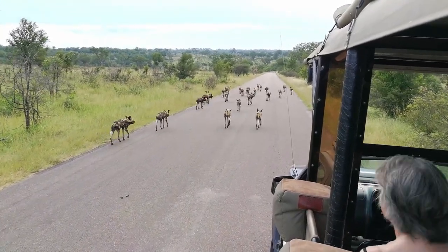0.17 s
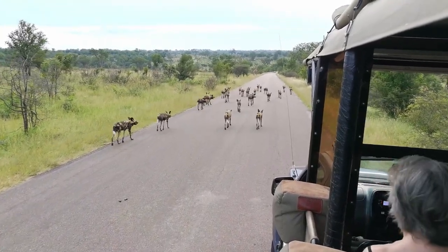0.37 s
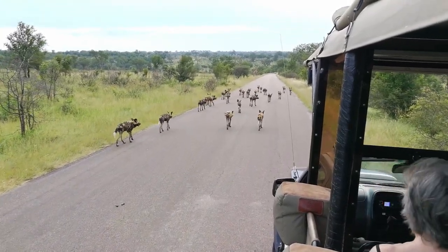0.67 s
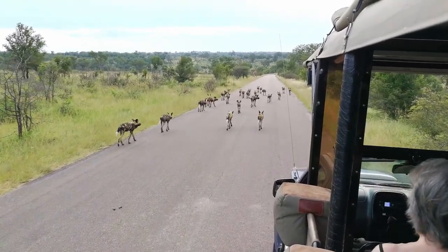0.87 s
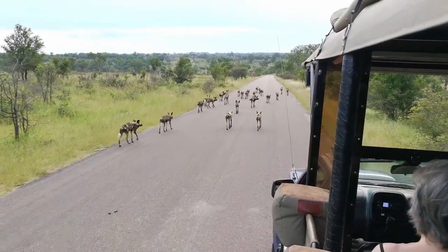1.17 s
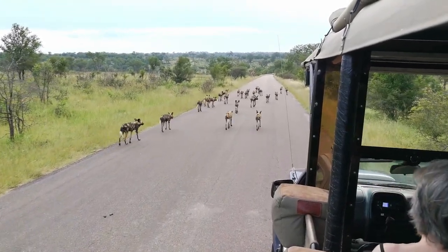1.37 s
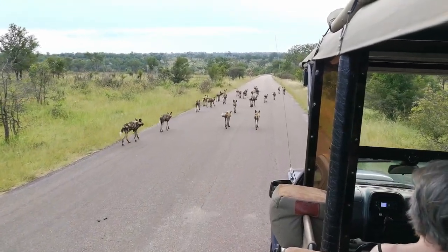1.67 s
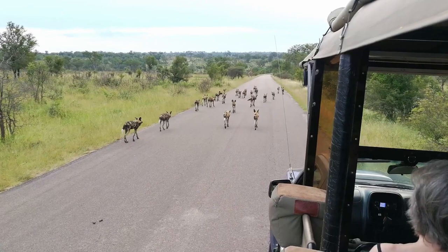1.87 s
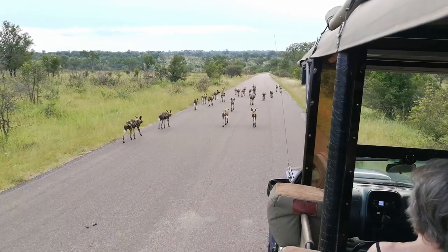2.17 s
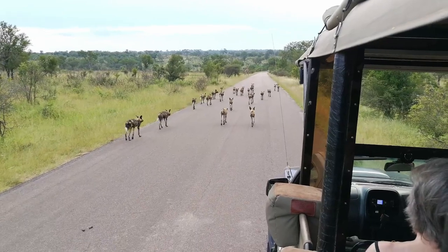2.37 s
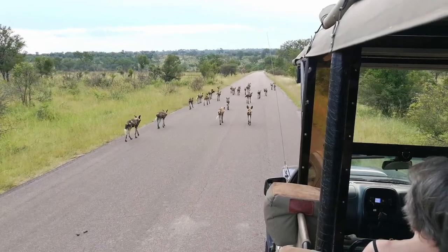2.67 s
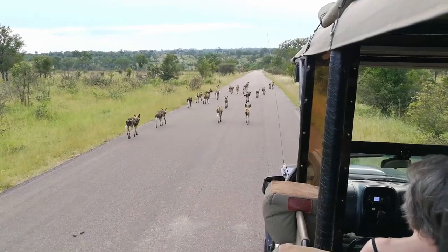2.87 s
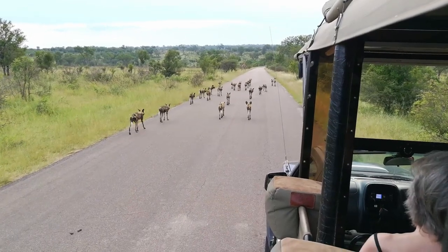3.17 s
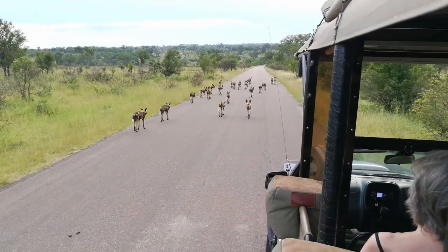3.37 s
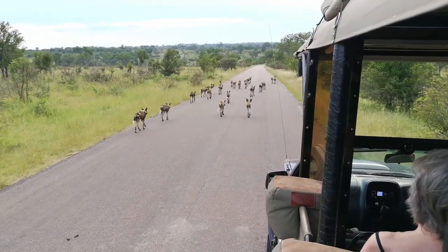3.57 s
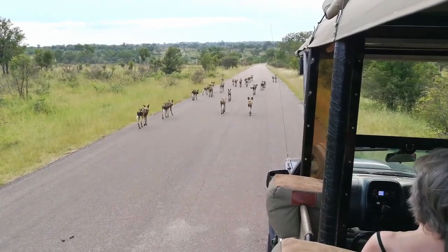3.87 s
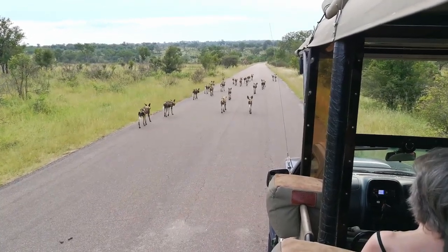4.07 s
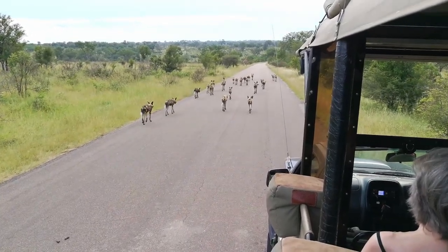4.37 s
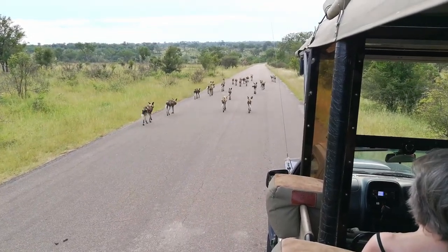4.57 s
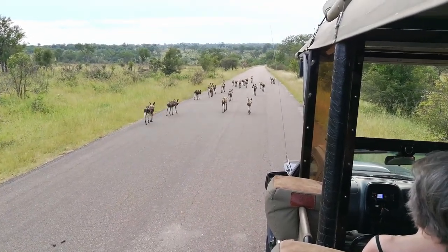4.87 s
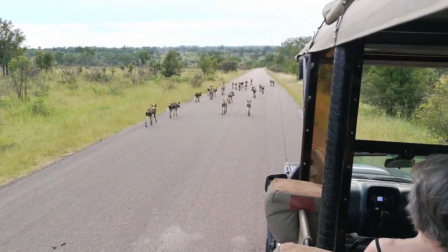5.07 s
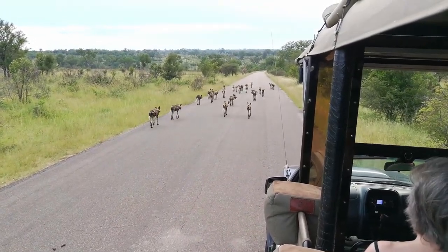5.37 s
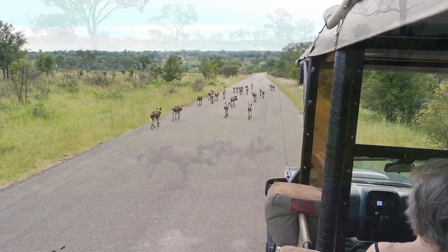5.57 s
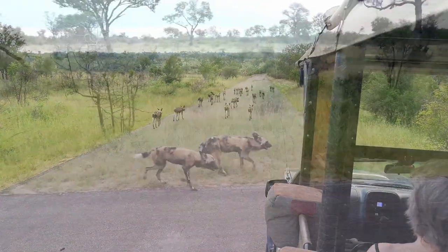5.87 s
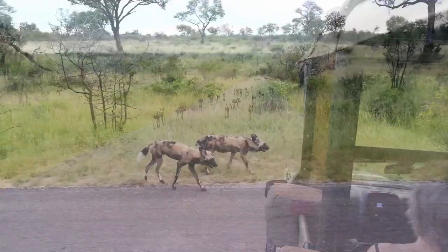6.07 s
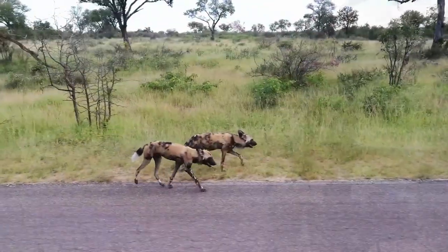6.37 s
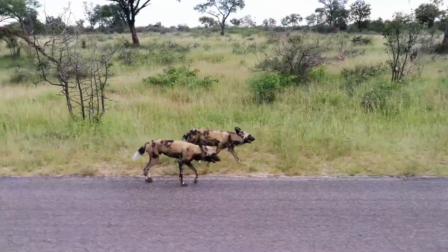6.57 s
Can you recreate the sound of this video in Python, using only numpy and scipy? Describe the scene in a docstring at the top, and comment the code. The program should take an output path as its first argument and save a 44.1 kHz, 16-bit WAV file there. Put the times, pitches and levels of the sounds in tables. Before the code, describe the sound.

Outdoors beside a vehicle on a bush road, a pack of wild dogs calls without pause. Tiny high chips and raspy squeals overlap throughout; wheezy whines and fluttering peeps fill the first half. From the middle onward, short bright yips jump out, louder and slightly to the left. Two brief whistles flick upward. Insects hiss thinly over faint air and low breeze, heard from a microphone near the pack.

```python
"""A pack of wild dogs calls on a bush road beside a parked open vehicle; insects hiss over faint outdoor air.
From the start: wheezy whines (tone, hum, throbbing wheeze) and thin fluttering peeps, until about 3.8 s.
Throughout: chips (fast pitch arches with an air puff) and raspy squeals (shaken harmonics with air noise).
Whistles flick up at 0.7 and 4.4 s; arched harmonic yips run from 2.5 to 5.9 s; two whimpers fall after 5.5 s.
Every call is scattered by the road, vehicle and scrub."""
import sys
import numpy as np
from scipy import signal
from scipy.fft import rfft, irfft
from scipy.io import wavfile

SR = 44100
rng = np.random.default_rng(int(sys.argv[2]) if len(sys.argv) > 2 else 0)


def to_wav(sig):
    """Store sig (one row per channel, or 1-D mono) as 16-bit WAV at the path in sys.argv[1].

    Samples outside -1..1 are clipped; the rate is SR.
    """
    pcm = np.clip(np.atleast_2d(sig), -1, 1) * 32767
    pcm = np.round(pcm).astype(np.int16)
    wavfile.write(sys.argv[1], SR, pcm.T)  # frames by channels


N = 296793
TIME_S = np.arange(N) / SR


def undb(db):
    """Decibels to gain."""
    return 10 ** (np.asarray(db) / 20)


def unit(x):
    """Scale to rms 1."""
    return x / np.sqrt(np.mean(x ** 2) + 1e-18)


def gain_at(hz, points):
    """Gain of a (freq_hz, gain_db) colour, interpolated over log frequency."""
    f, db = np.transpose(points)
    return undb(np.interp(np.log(np.maximum(hz, 1)), np.log(f), db))


def noise(points):
    """Gaussian noise shaped to a colour in the spectrum, rms 1."""
    freq_hz = np.arange(N // 2 + 1) * SR / N
    spectrum = rfft(rng.standard_normal(N)) * gain_at(freq_hz, points)
    return unit(irfft(spectrum, N))


def wobble(size, hz):
    """Random curve of spread about 1, with hz new values a second joined by straight lines."""
    steps = np.arange(size) * hz / SR
    return 1.2 * np.interp(steps, np.arange(4096), rng.standard_normal(4096))


def progress(length_s):
    """Runs from 0 to 1 through a call."""
    return np.linspace(0, 1, int(length_s * SR))


def swell(u, rise, fall):
    """Smooth onset and release, each a share of the call."""
    onset = np.sin(np.pi / 2 * np.clip(u / rise, 0, 1))
    release = np.sin(np.pi / 2 * np.clip((1 - u) / fall, 0, 1))
    return onset * release


def cycles(hz):
    """Phase in radians of a moving frequency."""
    return 2 * np.pi * np.cumsum(hz) / SR


def voice(hz, throat, mouth, count):
    """Harmonics of a moving pitch, weighted by the throat, whose resonances rise as the mouth opens."""
    k = np.arange(1, count + 1)[:, None]
    phase = cycles(hz) + 2 * np.pi * rng.random()
    return np.sum(gain_at(k * hz / mouth, throat) * np.sin(k * phase), axis=0)


def turbulence(centre_hz, width_hz):
    """Rushing air in a moving resonance: two random curves on a carrier in quadrature, rms 1."""
    phase = cycles(centre_hz)
    in_phase = wobble(len(centre_hz), width_hz) * np.sin(phase)
    quadrature = wobble(len(centre_hz), width_hz) * np.cos(phase)
    return unit(in_phase + quadrature)


def add(track, start_s, sound):
    """Mix a call into a track."""
    i = max(int(start_s * SR), 0)
    track[i:i + len(sound)] += sound[:N - i]


def outdoors(x, pan_db, near_db, far_db, near_t60_s=0.11, far_t60_s=0.39, shared=0.78):
    """Direct sound, quick reflections from road and vehicle, and a thin tail from the scrub, for two ears."""
    t = np.arange(SR // 2) / SR
    common, left, right = rng.standard_normal((3, len(t)))
    shared = np.clip(shared, 0, 1)
    ears = []
    for own, side in ((left, 1), (right, -1)):
        scatter = np.sqrt(shared) * common + np.sqrt(1 - shared) * own
        scatter = scatter * (1 - np.exp(-t / 0.0034))
        response = np.zeros(len(t))
        for db, t60_s in ((near_db, near_t60_s), (far_db, far_t60_s)):
            response += undb(db) * unit(scatter * np.exp(-np.log(1000) * t / t60_s))
        response /= np.sqrt(len(t))
        # direct sound from well to one side reaches the far ear a sample later
        lag = int(side * pan_db < -2)
        response[lag] += undb(side * pan_db / 2)
        ears.append(signal.fftconvolve(x, response)[:N])
    return np.array(ears)


# colour of the outdoor hush: [freq_hz, gain_db]
AIR_COLOUR = [(25, -9), (60, -18), (125, -3), (250, 2), (370, 3), (550, 2.5), (1000, -0.5), (2000, -2),
              (3600, -0.5), (5000, 4.5), (6800, 5.5), (7700, -1), (11000, -6.5), (15500, -10.5)]
# low rumble between the puffs: [time_s, level_db]
RUMBLE_LEVEL = [(0, -87), (2.1, -93), (2.6, -80), (4.1, -88), (4.6, -80), (5.6, -81), (6.73, -94)]
# low puffs of breeze: [middle_s, level_db]
BREEZE_PUFFS = [(0.84, -72), (2.27, -79), (3.13, -69), (3.88, -78), (4.76, -77), (5.8, -68)]
PUFF_WIDTH_S = 0.038


def air(air_db=-56.5, distance_db=-64.0, gust_db=3.0):
    """Diffuse hush, separate on each side; distant noise, uneven rumble and breeze puffs common to both."""
    hush = np.array([noise(AIR_COLOUR) for _ in range(2)])
    distance = noise([(100, -11.5), (350, -3.5), (1200, -1.5), (4000, 1.5), (8000, -65)])
    breeze = undb(np.interp(TIME_S, *np.transpose(RUMBLE_LEVEL)) + gust_db * wobble(N, 16))
    puffs = sum(undb(db) * np.exp(-((TIME_S - middle_s) / PUFF_WIDTH_S) ** 2) for middle_s, db in BREEZE_PUFFS)
    rumble = noise([(20, -9), (65, 5), (110, -1.5), (250, -23.0), (1000, -67)]) * (breeze + puffs)
    return undb(air_db) * hush + undb(distance_db) * distance + rumble


# colour of the insect hiss: [freq_hz, gain_db]
INSECT_COLOUR = [(7750, -49), (8100, -4), (8650, 3), (9100, -2), (9450, 1.5), (9800, -6.5), (10200, -11.5),
                 (11200, -31)]
INSECT_START_DB, INSECT_FADE_DB_PER_S = -53.7, 0.28


def insects(swell_db=0.46, swell_hz=4, shimmer_db=0.92, shimmer_hz=60):
    """Many insects merge into a slowly thinning band of noise; each side shimmers on its own."""
    db = INSECT_START_DB - INSECT_FADE_DB_PER_S * TIME_S + swell_db * wobble(N, swell_hz)
    return np.array([noise(INSECT_COLOUR) * undb(db + shimmer_db * wobble(N, shimmer_hz)) for _ in range(2)])


# soft falling whimpers: [start_s, length_s, mid_pitch_hz, level_db]
WHIMPER_CALLS = [(5.585, 0.055, 3080, -55), (6.617, .09, 2300, -59)]


def whimpers(fall=0.12):
    """Short, soft, breathy notes of narrow noise that slide down."""
    out = np.zeros(N)
    for start_s, length_s, hz, db in WHIMPER_CALLS:
        u = progress(length_s)
        note = turbulence(hz * (1 + fall * (.5 - u)), 205)
        add(out, start_s, undb(db) * note * swell(u, .15, 0.97))
    return outdoors(out, pan_db=2, near_db=-4, far_db=-19)


# long wheezy whines: [start_s, length_s, mid_pitch_hz, level_db]
WHINE_CALLS = [(0, 0.36, 2180, -65), (.28, 0.42, 2125, -58), (1.118, 0.38, 2170, -60.5),
               (1.498, 0.33, 2290, -57), (1.741, 0.25, 2120, -58.5), (3.108, .3, 2215, -55),
               (3.362, 0.28, 2073, -59.5)]
WHEEZE_HZ = 4767  # centre of the high wheeze over every whine


def whines(fall=0.063, throb_hz=70, hum_hz=365, hum_db=-15.5, third_db=-19, tone_db=-8,
           overtone_db=-11, core_db=-6, fade_db=4, waver=0.0139, flutter_db=2.0):
    """A hoarse tone sinks between a faint low hum and a throbbing high wheeze with a whistling core."""
    out = np.zeros(N)
    for start_s, length_s, hz, db in WHINE_CALLS:
        u = progress(length_s)
        size = len(u)
        sink = 1 + fall * (.5 - u) + waver * wobble(size, 89.5)
        tone = undb(tone_db) * turbulence(hz * sink, 280)
        tone = tone + undb(overtone_db) * turbulence(4100 * sink, 300)
        phase = cycles(hum_hz * (1 + 0.018 * wobble(size, 144.7)))
        hum = undb(hum_db) * np.sin(phase) + undb(third_db) * np.sin(3 * phase)
        wheeze = np.sin(cycles(WHEEZE_HZ * (1 + 0.0807 * wobble(size, 2600))))
        wheeze = wheeze + undb(core_db) * turbulence(WHEEZE_HZ * np.sqrt(sink), 260)
        beat = 1 + .65 * np.sin(cycles(throb_hz * (1 + .12 * wobble(size, 40))))
        wheeze_gain = beat * undb(flutter_db * wobble(size, 37.3) - fade_db * u)
        whine = unit(tone + hum + wheeze * wheeze_gain)
        add(out, start_s, undb(db) * whine * swell(u, 0.019, 0.23))
    return outdoors(out, pan_db=-1.5, near_db=-7.5, far_db=-1.5)


# whistles: [start_s, length_s, base_pitch_hz, start_level_db, sag_share_of_pitch]
WHISTLE_CALLS = [(0.66, 0.078, 4890, -50.5, 0.077), (4.362, .11, 5010, -44, 0.045)]


def whistles(scoop=0.062, flick=0.184, fade_db=6.3):
    """Pure sine notes that scoop in, sag, then flick upward, fading all the way."""
    out = np.zeros(N)
    for start_s, length_s, hz, db, sag in WHISTLE_CALLS:
        u = progress(length_s)
        bend = sag * (.5 - u) + flick * u ** 7 - scoop * np.exp(-u / 0.084)
        pitch_hz = hz * (1 + bend + 0.0067 * wobble(len(u), 460))
        note = unit(np.sin(cycles(pitch_hz)))
        add(out, start_s, undb(db - fade_db * u) * note * swell(u, 0.18, 0.065))
    return outdoors(out, pan_db=-1, near_db=-16, far_db=-21)


# thin rough peeps: [start_s, level_db]
PEEP_CALLS = [(0, -46), (0.088, -55), (0.163, -46), (0.321, -49.5), (0.385, -47), (0.49, -50), (0.6, -49),
              (0.72, -45.5), (1.51, -47), (2.339, -52.5), (2.457, -52), (2.592, -50.5), (2.724, -49.5),
              (2.861, -48), (3.023, -47), (3.184, -50.5), (3.679, -49)]


def peeps(length_s=0.0408, hz=4950, climb=0.1564, rough=0.066, trill_hz=170, trill=0.038):
    """Thin sine notes, roughened by random pitch shake, that trill as they rise."""
    out, u = np.zeros(N), progress(length_s)
    for start_s, db in PEEP_CALLS:
        shake = trill * np.sin(2 * np.pi * (trill_hz * length_s * u + rng.random()))
        shake = shake + rough * wobble(len(u), 2217)
        pitch_hz = hz * (1 + climb * (np.sqrt(u) - .65) + shake)
        add(out, start_s, undb(db) * unit(np.sin(cycles(pitch_hz))) * swell(u, 0.083, 1.0))
    return outdoors(out, pan_db=0, near_db=-4.0, far_db=-35)


# chips, before the voice and puff offsets: [middle_s, level_db]
CHIP_CALLS = [(0.17, -49), (0.389, -51), (0.578, -49.5), (0.711, -48), (0.935, -48), (1.141, -50),
              (1.391, -49.5), (1.563, -50.5), (1.707, -47), (1.888, -50), (2.027, -51), (2.244, -49.5),
              (2.289, -57.5), (2.703, -49), (2.807, -47), (3.015, -48), (3.235, -47.5), (3.641, -57),
              (4.09, -49), (4.287, -51.5), (4.574, -48.5), (4.779, -50.5), (4.981, -46.5), (5.202, -47.5),
              (5.267, -59), (5.322, -57), (5.424, -46.5), (5.646, -50), (5.801, -47.5), (5.969, -46),
              (6.162, -47.5), (6.307, -47.5), (6.428, -45), (6.624, -46.5)]
# chip throat colour: [freq_hz, gain_db]
CHIP_COLOUR = [(1200, -7), (2200, -9), (3000, -4), (3400, 1.5), (4200, -4), (6000, -13.5), (9000, -35)]
FAINT_CHIP_DB, FAINT_CHIP_SPREAD_DB = -55, 6.5  # centre and half range, before the same offsets


def chips(length_s=.018, top_hz=3420, drop=1.1, voice_db=4.5, puff_db=-8, faint_count=8):
    """An air puff leads a pitch that shoots up and straight down; a few faint chips fall at random times."""
    out, u, v = np.zeros(N), progress(length_s), progress(1.82 * length_s)
    faint = [(when * N / SR, FAINT_CHIP_DB + FAINT_CHIP_SPREAD_DB * (2 * size - 1))
             for when, size in rng.random((faint_count, 2))]
    for middle_s, db in list(CHIP_CALLS) + faint:
        scatter = 0.0227 * rng.standard_normal() + 0.042 * wobble(len(u), 1720)
        pitch_hz = top_hz * np.exp(-drop * (2 * u - 1) ** 2 + scatter)
        chirp = voice(pitch_hz, CHIP_COLOUR, 0.964, count=2) * swell(u, 0.11, 0.23)
        puff = turbulence(np.full(len(v), top_hz), 1800) * swell(v, 0.29, 0.22)
        add(out, middle_s - length_s / 2, undb(db + voice_db) * chirp)
        add(out, middle_s - length_s, undb(db + puff_db) * puff)
    return outdoors(out, pan_db=-.5, near_db=-5, far_db=-15, near_t60_s=.07, far_t60_s=.4, shared=.7)


# raspy squeals: [start_s, length_s, level_db]
RASP_CALLS = [(0.237, 0.2, -52), (0.675, 0.18, -53), (1.107, 0.22, -49), (1.521, 0.23, -50),
              (1.995, 0.2, -49), (2.393, 0.22, -49), (2.791, 0.18, -51.5), (3.186, .23, -51.5),
              (3.71, 0.16, -50), (4.137, 0.15, -53.5), (4.526, .21, -50.5), (4.991, 0.2, -49),
              (5.443, 0.18, -49.5), (5.876, 0.18, -48), (6.341, 0.17, -51)]
# squeal throat colour: [freq_hz, gain_db]
RASP_COLOUR = [(1000, 7), (1300, -4.5), (2500, 1), (3700, 14.5), (4500, -59), (5300, 4.5), (6300, -7.5),
               (8000, -34)]
RASP_HZ, RASP_AIR_DB = 1253.5, -5.5  # base pitch, air noise relative to the voice


def rasps(arch=.16, rough=0.0274, rattle=0.06, rattle_hz=270, flutter=0.13, air_hz=3100):
    """Rising and falling squeals; a second, slower vibration splits each harmonic into a cluster."""
    out = np.zeros(N)
    for start_s, length_s, db in RASP_CALLS:
        u = progress(length_s)
        size = len(u)
        mouth = 1 + arch * (.2 - (2 * u - 1) ** 2)
        shake = np.sin(cycles(rattle_hz * (1 + 0.2426 * wobble(size, 300))))
        pitch_hz = RASP_HZ * mouth * (1 + rattle * shake + rough * wobble(size, 800))
        cry = unit(voice(pitch_hz, RASP_COLOUR, mouth, count=6))
        cry = cry + undb(RASP_AIR_DB) * turbulence(air_hz * mouth, 2800)
        squeal = unit(cry * (1 + 0.46 * shake + flutter * wobble(size, 197.4)))
        add(out, start_s, undb(db) * squeal * swell(u, 0.36, 0.24))
    return outdoors(out, pan_db=-1.8, near_db=-3.0, far_db=-15.5, near_t60_s=0.11, far_t60_s=0.22, shared=0.83)


# clear yips: [start_s, length_s, top_pitch_hz, level_db, mouth_factor_on_resonances]
YIP_CALLS = [(2.497, 0.065, 744.4, -38, 0.96), (3.059, 0.064, 709, -36.5, 0.96),
             (3.759, 0.051, 717.5, -33, 0.99), (4.403, 0.06, 723, -33, 0.99), (5.003, .066, 672, -39, 0.9),
             (5.869, 0.063, 676, -39.5, 0.91)]
# yip throat colour: [freq_hz, gain_db]
YIP_COLOUR = [(700, -33.5), (1400, -16.5), (2100, -19.5), (2800, 4), (3100, 1.5), (3550, 3), (4200, -15),
              (5000, -17), (6500, -61)]
YIP_RISE, YIP_HOLD = 0.229, 0.607  # shares of a yip: voice fully up, voice starts to give way
YIP_SCOOP, YIP_DROP, YIP_ARCH = 0.1345, 0.191, 0.16  # pitch lost at start, at end; bend of the top
YIP_EDGE_DB = -20.5  # effort at both ends relative to the top
YIP_OPENS, YIP_CLOSES = 0.448, 0.17  # share by which the mouth lowers resonances at start, at end


def yips(jitter=0.042, crack_db=-2, trail_db=-67, top_rough=0.19, edge_rough=1.0):
    """Pitch and mouth arch together; the voice is cleanest at the top and cracks as it starts and stops."""
    out, trail = np.zeros(N), np.zeros(N)
    for start_s, length_s, hz, db, gape in YIP_CALLS:
        u = progress(length_s)
        onset = np.maximum(1 - u / YIP_RISE, 0)
        release = np.maximum((u - YIP_HOLD) / (1 - YIP_HOLD), 0)
        bend = YIP_ARCH * (np.minimum(u, YIP_HOLD) - YIP_HOLD / 2) ** 2
        ratio = 1 - YIP_SCOOP * onset - YIP_DROP * release - bend
        mouth = gape * (1 - YIP_OPENS * onset - YIP_CLOSES * release)
        effort_db = YIP_EDGE_DB * (onset + release)
        rough = top_rough + edge_rough * (onset + release)
        pitch_hz = hz * ratio * (1 + jitter * rough * wobble(len(u), 1500))
        tone = unit(voice(pitch_hz, YIP_COLOUR, mouth, count=9))
        crack = undb(crack_db) * rough * turbulence(2700 * mouth, 2000)
        add(out, start_s, undb(db + effort_db) * (tone + crack) * swell(u, 0.035, 0.033))
        # a faint low note lingers after each yip
        linger = turbulence(np.full(len(u), hz), 80) * swell(u, 0.083, 0.79)
        add(trail, start_s + length_s, undb(trail_db) * linger)
    return trail + outdoors(out, pan_db=7.3, near_db=-14, far_db=-14, near_t60_s=.09, far_t60_s=.42, shared=.4)


def scene():
    """All the calls over the insects and the air."""
    background = air() + insects()
    soft_calls = whimpers() + whines() + whistles() + peeps()
    return background + soft_calls + chips() + rasps() + yips()


def record(dry):
    """Steep elliptic low-pass removes the top of the treble."""
    top_hz, ripple_db, stop_db = 15500, .2, 70
    return signal.sosfilt(signal.ellip(10, ripple_db, stop_db, top_hz, fs=SR, output="sos"), dry)


dry = scene()
out = record(dry)
to_wav(out)
```